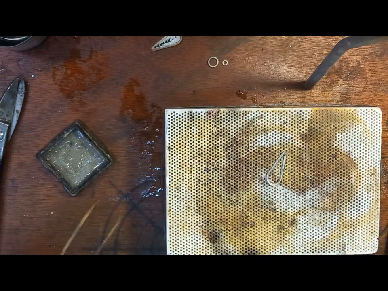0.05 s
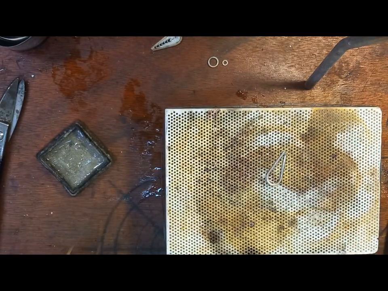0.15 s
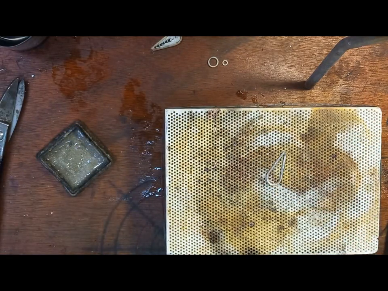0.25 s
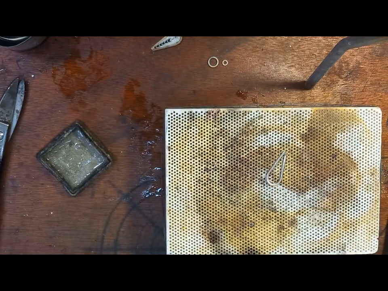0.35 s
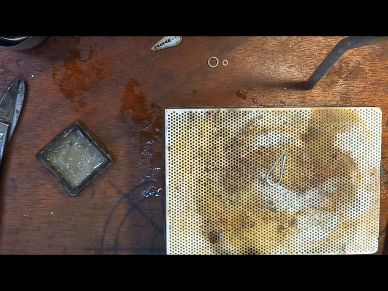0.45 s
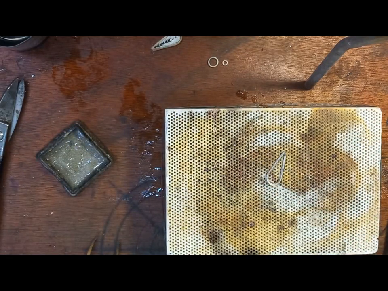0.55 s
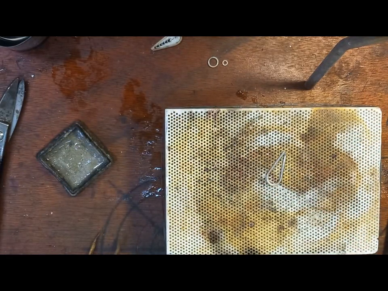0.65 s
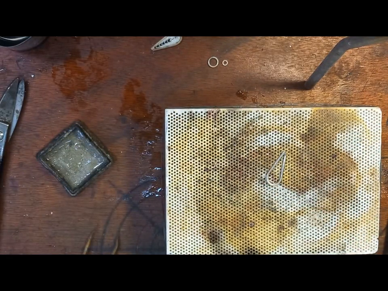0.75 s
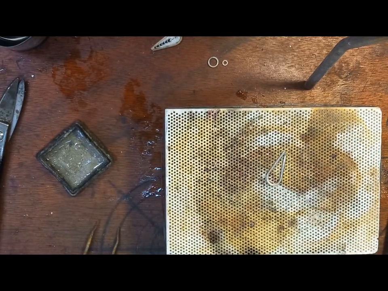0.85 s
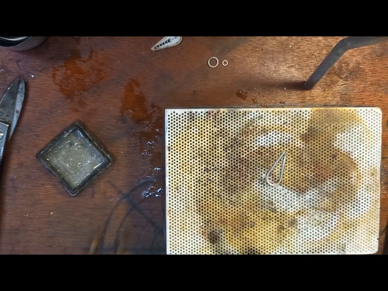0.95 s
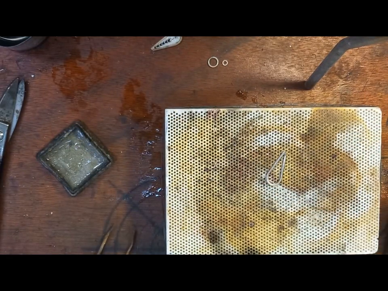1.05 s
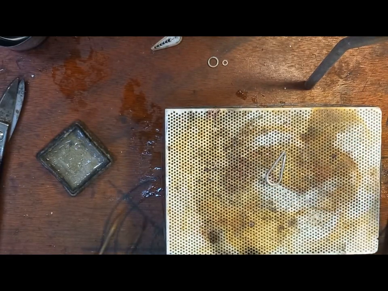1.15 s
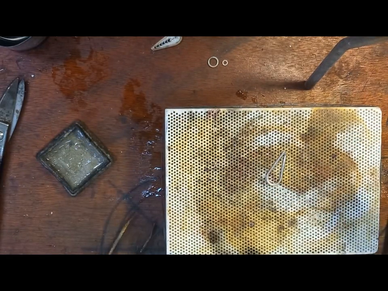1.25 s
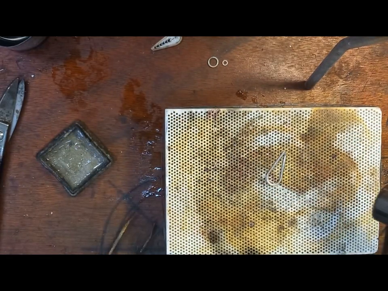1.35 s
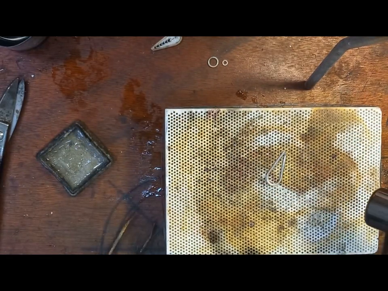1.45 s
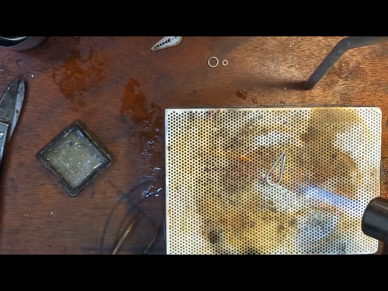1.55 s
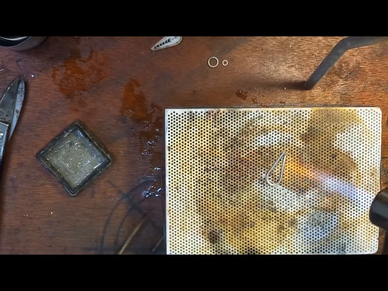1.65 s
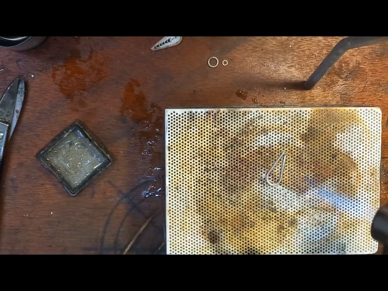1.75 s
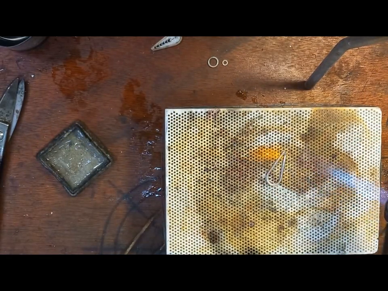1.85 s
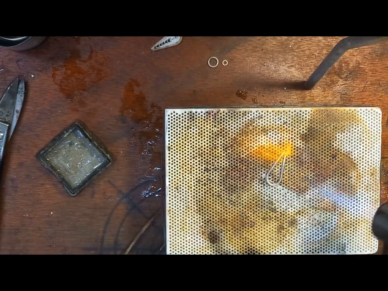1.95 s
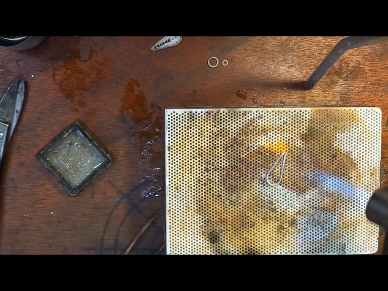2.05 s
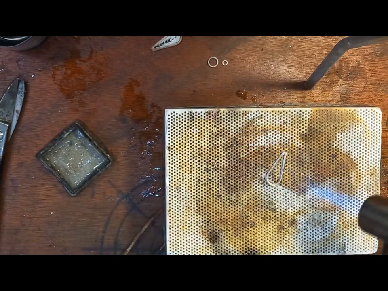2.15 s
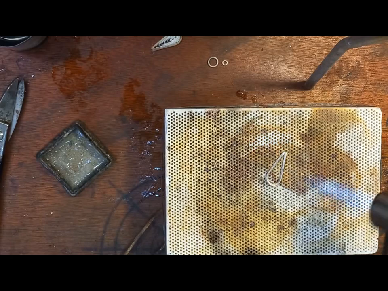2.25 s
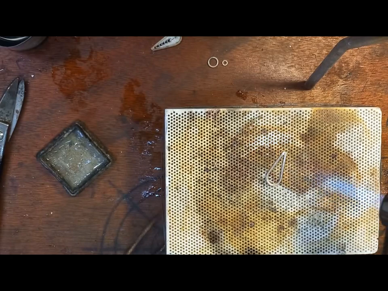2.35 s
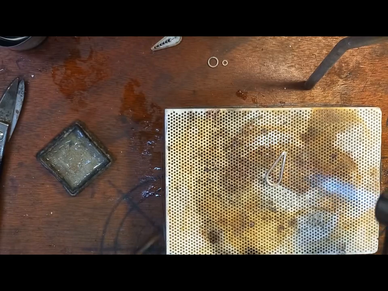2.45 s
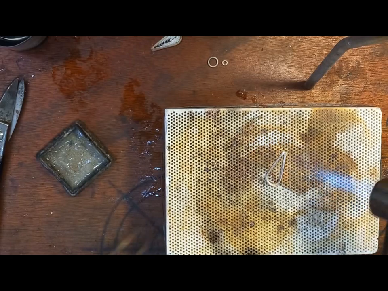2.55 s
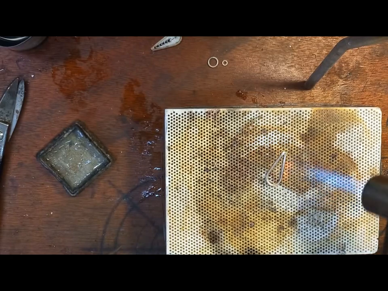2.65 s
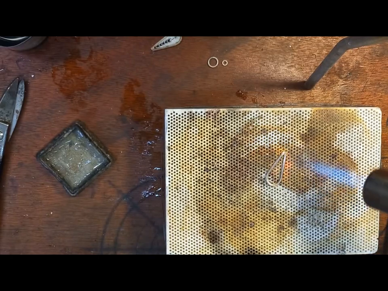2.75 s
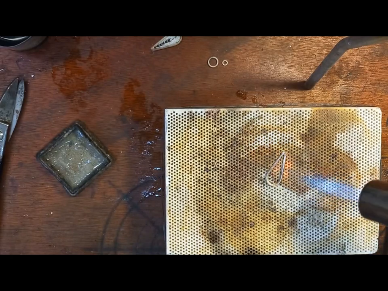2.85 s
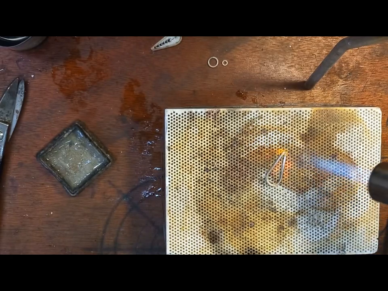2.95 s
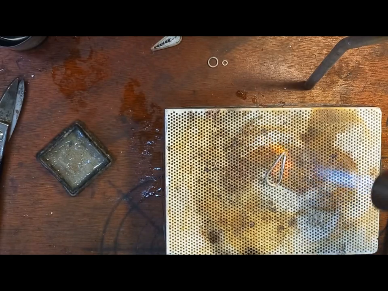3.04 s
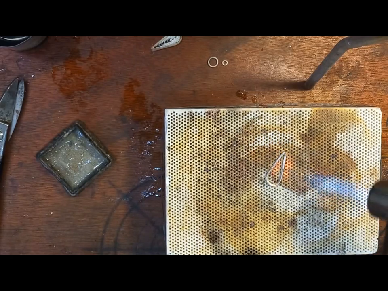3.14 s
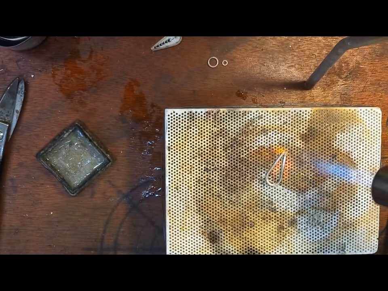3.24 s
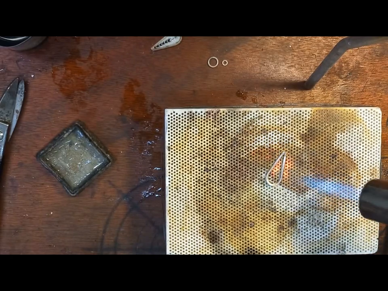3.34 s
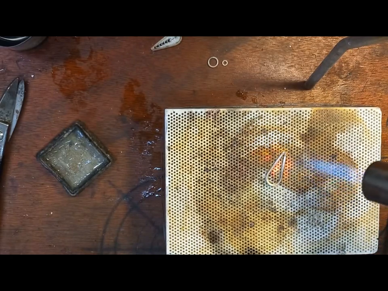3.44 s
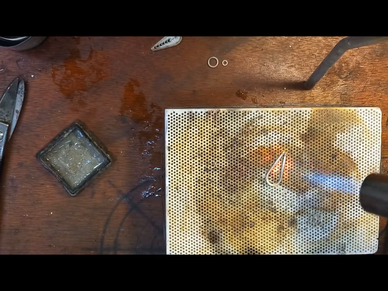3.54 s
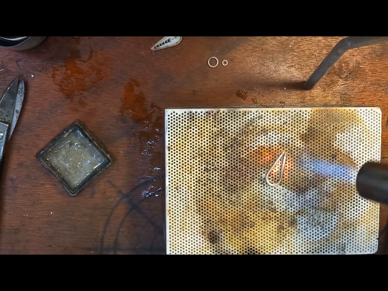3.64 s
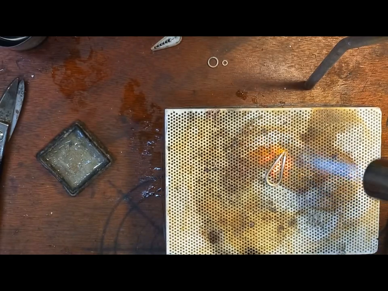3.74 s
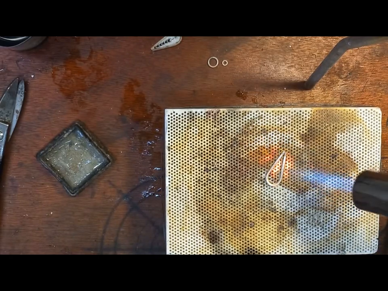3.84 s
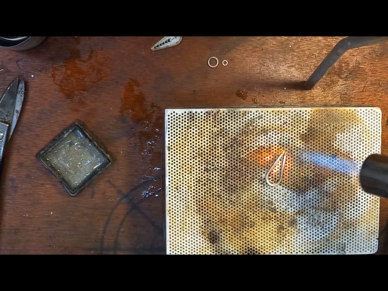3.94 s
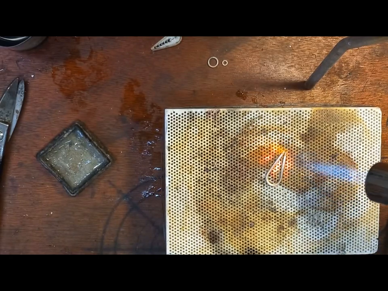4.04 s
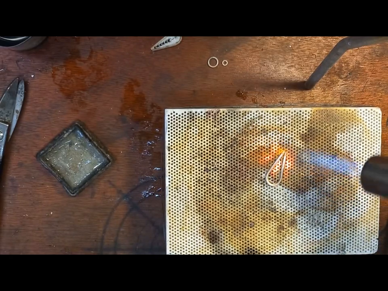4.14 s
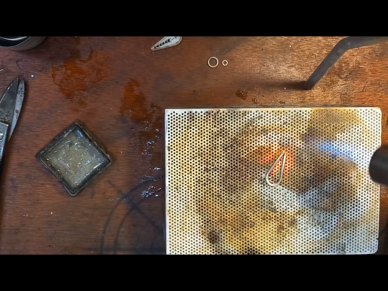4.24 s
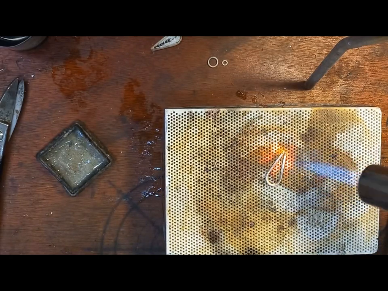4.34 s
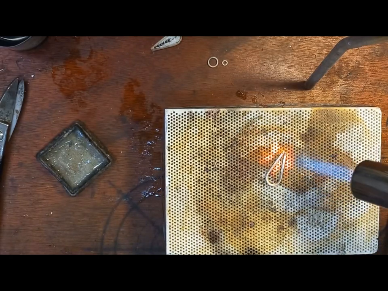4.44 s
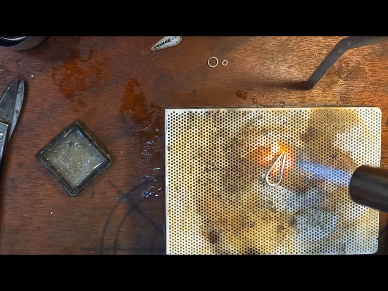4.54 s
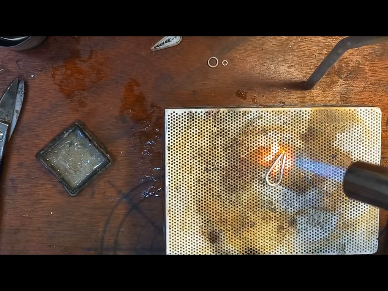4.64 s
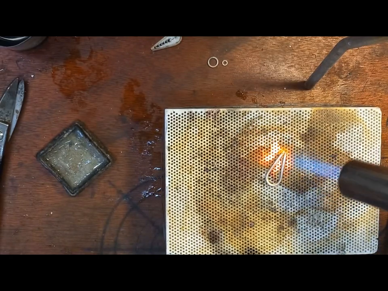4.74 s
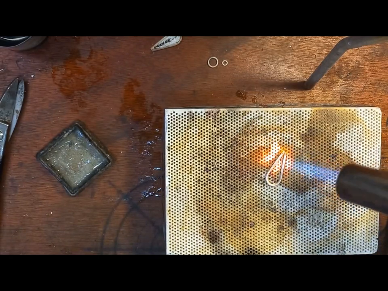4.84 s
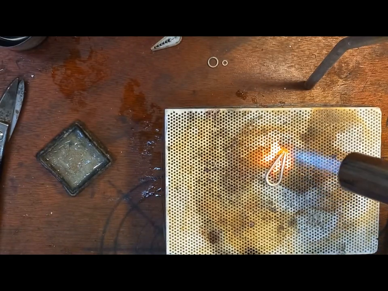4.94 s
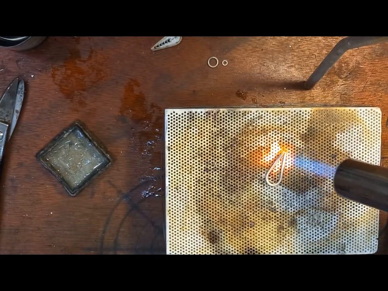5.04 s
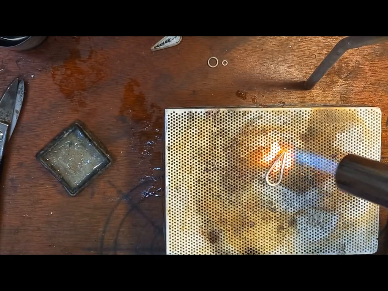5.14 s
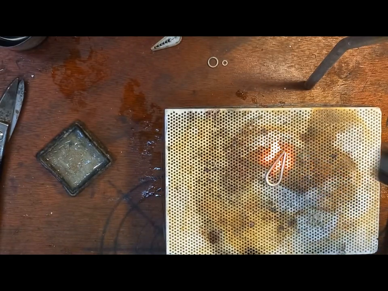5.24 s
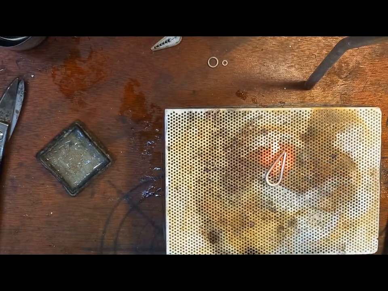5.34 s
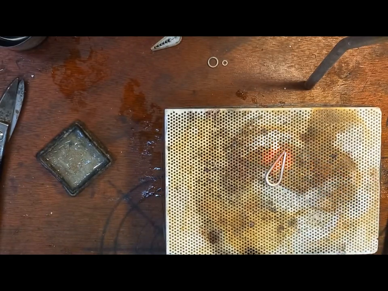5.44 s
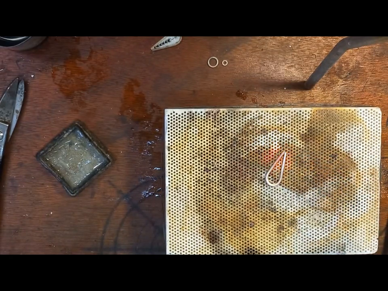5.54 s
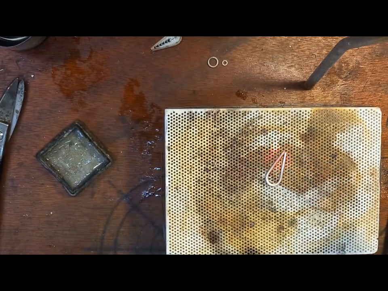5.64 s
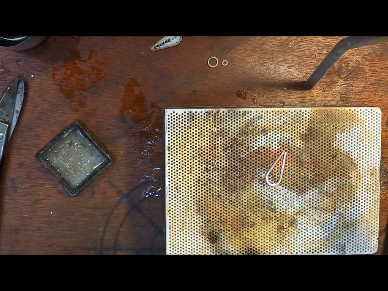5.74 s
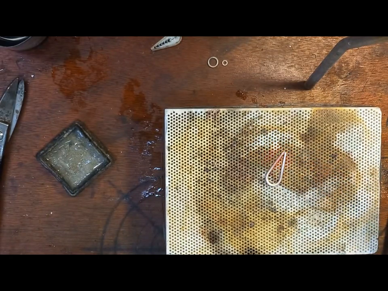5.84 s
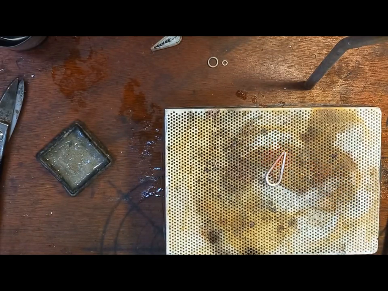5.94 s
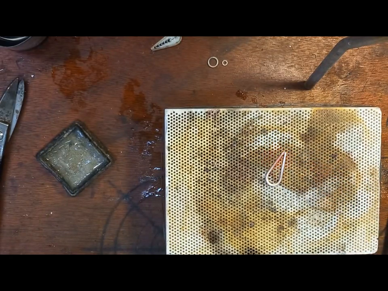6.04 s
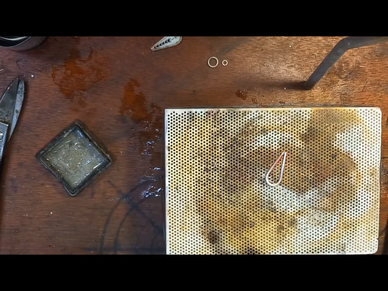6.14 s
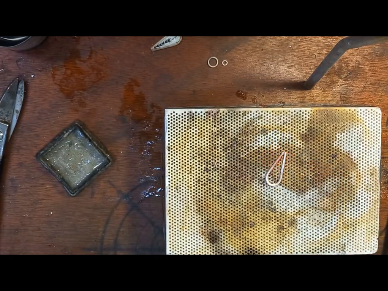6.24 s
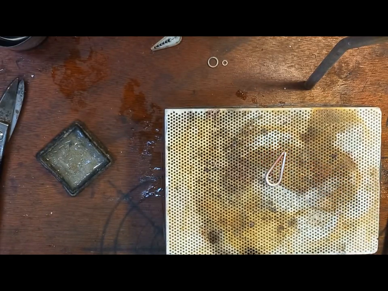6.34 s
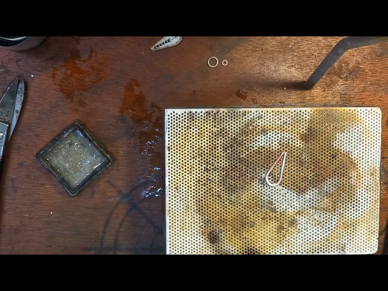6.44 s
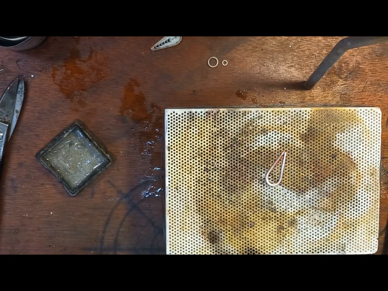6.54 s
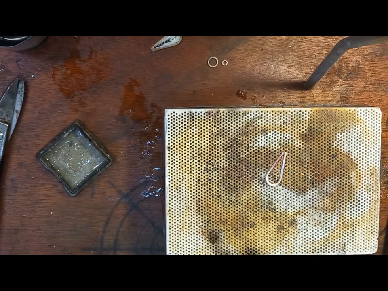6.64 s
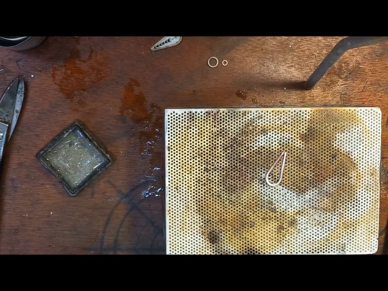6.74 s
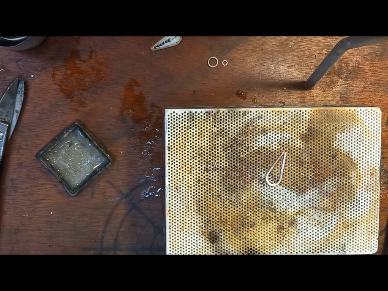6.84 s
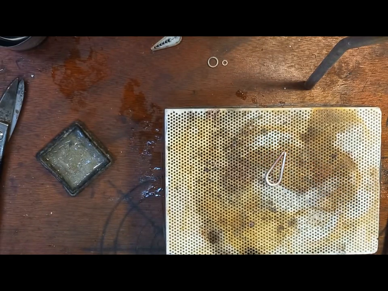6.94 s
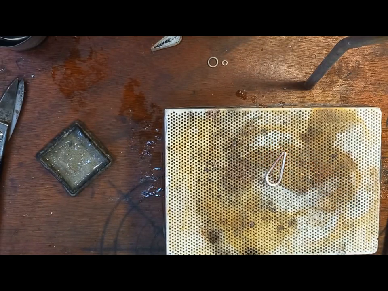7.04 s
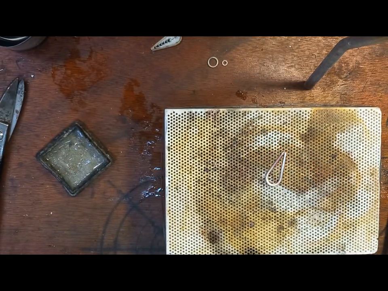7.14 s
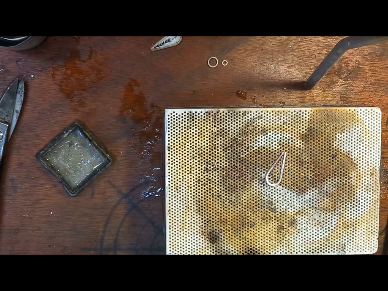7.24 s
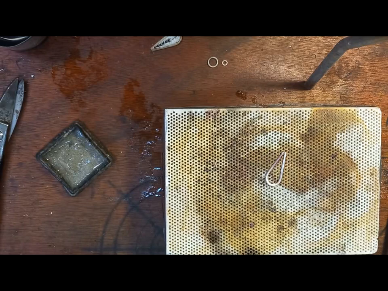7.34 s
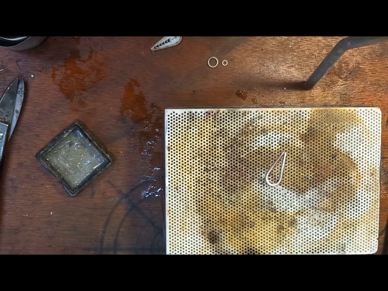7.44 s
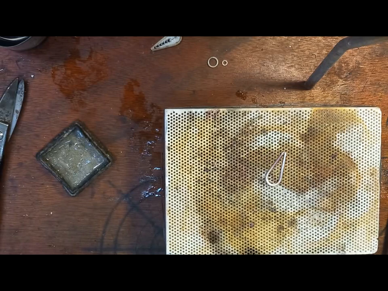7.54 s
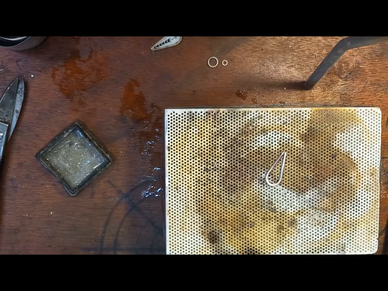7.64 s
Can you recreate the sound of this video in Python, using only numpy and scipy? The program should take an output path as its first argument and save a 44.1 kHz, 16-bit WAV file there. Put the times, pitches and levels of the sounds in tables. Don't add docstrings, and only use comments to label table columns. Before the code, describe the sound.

A close stereo microphone at a workbench in a small, short-sounding room; a ventilation motor rumbles and hums low throughout, with a faint wandering tone. From 0 to 0.9 s fingers, sleeves and small parts tick, slide and rub quietly, with a dull ringing contact near 0.6. At 0.95 s the torch body knocks hard on the bench, and a lighter knock follows at 1.25. Gas opens at 1.4 s with a thin, whistling hiss; at 1.53 a loud, bright spark cracks and the flame catches. It roars and hisses unevenly, its colour shifting as it moves over the brick and growing slightly stronger around 3 s. At 5.23 s the valve snaps and the flame dies almost instantly. A dull sleeve drag and two very faint, high squeaks come around 5.8 to 6.1, then sparse metal ticks and soft cloth rubs from 6.1 to 7.7.

```python
import sys
import numpy as np
from scipy import signal
from scipy.fft import rfft, irfft, next_fast_len
from scipy.io import wavfile
from scipy.ndimage import uniform_filter1d, map_coordinates

SR = 44100
rng = np.random.default_rng(int(sys.argv[2]) if len(sys.argv) > 2 else 0)


def pcm_store(signal):
    levels = np.round(np.clip(np.atleast_2d(signal), -1, 1) * 32767)
    wavfile.write(sys.argv[1], SR, levels.astype(np.int16).T)


def amplitude_ratio(level_db):
    exponent = np.asarray(level_db, float) / 20
    return 10 ** exponent


N = 339035
T = np.arange(N) / SR

# t/s, level/dB
FLAME = [(1.53, -27), (1.85, -25), (2.6, -26.5), (3.05, -24), (3.3, -24.5), (3.8, -24), (4.3, -25),
         (4.6, -24.5), (4.9, -24.5), (5.23, -24.5)]
# f/Hz, correlation
ALIKE_FLAME = [(150, .5), (210, .97), (650, .95), (780, .7), (950, .93), (1400, .7), (2100, .92),
               (2900, .5), (3350, .85), (4000, .7), (4600, .8), (6500, .55), (8300, .7), (13000, .5)]
# f/Hz, correlation
ALIKE_ROOM = [(60, 1), (110, 0.88), (170, 0.35), (250, 0.91), (450, 0.9), (700, 0.81), (1200, 0.27),
              (2400, .3), (4400, 0.082)]


def unit(x):
    return x / np.sqrt(np.mean(x ** 2) + 1e-20)


def along(points, hz):
    f, *columns = np.transpose(points)
    return np.array([np.interp(np.log(hz + 1), np.log(f + 1), column) for column in columns])


def colour(points, hz):
    low_edge = np.clip(hz / points[0][0], 0, 1) ** 8
    high_edge = np.clip(hz / points[-1][0], 1, 9) ** 8
    return amplitude_ratio(along(points, hz)) * low_edge / high_edge


def peak(hz, centre_hz, width_hz):
    return 1 / (1 + ((hz - centre_hz) / width_hz) ** 2)


def wobble(rate, size=N):
    knots = rng.standard_normal(int(size * rate / SR) + 4)
    return map_coordinates(knots, [np.arange(size) * rate / SR])


def filtered(x, response):
    m = next_fast_len(x.shape[-1] + 8192)
    spectrum = rfft(x, m) * response(np.fft.rfftfreq(m, 1 / SR))
    return irfft(spectrum, m)[..., :x.shape[-1]]


def patches(shape, bands, frames):
    field = uniform_filter1d(rng.standard_normal(shape), size=bands, axis=-2)
    return unit(uniform_filter1d(field, size=frames, axis=-1))


def rush(gain, alike, patchy_db, size=N, lead=((1, 0),)):
    z = signal.stft(rng.standard_normal((2, size + 512)), nperseg=512)[2]
    z = z * amplitude_ratio(patchy_db * patches(z.shape[1:], 6, 12))
    pair = signal.istft(z, nperseg=512)[1][:, :size]

    def split(hz):
        turn = np.arccos(np.clip(along(alike, hz)[0], -1, 1)) / 2
        return np.array([np.cos(turn), np.sin(turn)])

    def shift(hz):
        return np.exp(np.array([[-.5j], [.5j]]) * along(lead, hz))

    mid, side = filtered(pair, split)
    return unit(filtered(np.array([mid + side, mid - side]), lambda hz: gain(hz) * shift(hz)))


def moving(x, depth_db):
    z = signal.stft(x, nperseg=1024)[2]
    z = z * amplitude_ratio(depth_db * patches(z.shape, 4, 70) - .115 * depth_db ** 2)
    return signal.istft(z, nperseg=1024)[1][:, :N]


def add(out, s, x):
    part = out[:, round(s * SR):][:, :x.shape[1]]
    part += x[:, :part.shape[1]]


def echoes(x, wet_db):
    # f/Hz, time to fall 60 dB/s
    room = [(200, 0.31), (1000, 0.16), (4000, 0.17), (12000, 0.14)]
    hz, t, z = signal.stft(rng.standard_normal((2, SR // 4)), SR, nperseg=256)
    decay_db = -60 * t / along(room, hz)[0][:, None]
    tail = signal.istft(z * amplitude_ratio(decay_db), SR, nperseg=256)[1]
    wet = signal.fftconvolve(x, tail / np.linalg.norm(tail[0]), axes=1)[:, :x.shape[1]]
    late = round(0.0033 * SR)
    return x + amplitude_ratio(wet_db) * np.pad(wet, ((0, 0), (late, 0)))[:, :x.shape[1]]


def torch():
    comb = np.array([wobble(1400, size=SR // 2), wobble(1400, size=SR // 2)])

    def ripple(hz, depth_db):
        return amplitude_ratio(depth_db * comb[:, np.minimum(hz, SR // 2 - 1).astype(int)] * (hz > 1100))

    return flame(ripple) + unlit_gas(ripple)


def flame(ripple):
    # f/Hz, left level/dB, right level/dB
    roar_colour = [(154, -18.5, -19.5), (204.8, -3.5, 0), (258, -10.5, -8), (414, -4, -2.5), (608, -5, -6),
                   (800, -32, -12.5), (921, -9.5, -9.5), (1163, -16.5, -12), (1330, -15, -41),
                   (1468, -29.5, -13), (1637, -11, -22.5), (1770, -12.5, -16), (2366, -15.5, -17.5),
                   (2694, -27, -33.5)]
    # f/Hz, left level/dB, right level/dB
    jet_colour = [(2300, 11, -2), (2540, -14.5, -11.5), (3340, -6.5, -7), (4250, -11, -5.5),
                  (4850, -9, -14.5), (5600, -18.5, -9), (6830, -15, -9.5), (7940, -10.5, -0.5),
                  (8210, -0.5, -26), (8980, -19, -27.5), (9700, -22.5, -22.5), (11540, -18, -20.5),
                  (12560, -13, -12.5), (15750, -25, -21.5)]
    # f/Hz, width/Hz, left level/dB, right level/dB
    standing = [(210, 18, 3.5, 2.5), (288, 6.7, 4.5, -7), (331.6, 4.2, 12.5, 5.5), (363.5, 5.8, -1.5, -1),
                (391, 10.3, -1.5, 4.5), (443, 8.4, -0.5, 6), (456.5, 5.8, -16, -20), (530, 6.5, -3.5, -20),
                (572.2, 3.4, 6.5, 10), (623, 16.6, -2.5, -4), (636.5, 24, 7, 7.5), (703, 11, 18, -6),
                (710, 13, -14, 5), (843.3, 5, 18, 7.5), (868, 18, 6.5, -6), (918, 6.5, -10, -13),
                (905.6, 7.2, 5, 7), (1065, 6.8, 0.5, 1), (1298, 8.9, 8.5, -3), (1402, 14.6, 6.5, 14.5),
                (1557, 13, 0, 11), (1694, 27, -3.5, -5), (1910, 42, 3, 3), (2040, 8.8, -9, 0),
                (2510, 15, -7, -19), (2552, 23, 4.5, 8.5), (5300, 69, 7, 8.5), (6320, 150, -9, 5.5),
                (6600, 180, 8, -4), (7630, 170, 5.5, -5)]
    # f/Hz, lead of the right side/radians
    lead_flame = [(2550, 0), (2850, 1.4), (3400, .4), (3650, 1.6), (3900, .3), (4080, 3), (4700, 0),
                  (5150, 3), (5400, 2), (6250, 3), (7000, 6.3), (7700, 8.9), (8400, 9.5), (8900, 11),
                  (10500, 10.5)]

    strength_db = np.interp(T, *np.transpose(FLAME))
    swing_db = strength_db - np.mean(FLAME, axis=0)[1]
    burn_db = np.array([strength_db, -39.5 + 0.54 * swing_db, -48 + 0.77 * swing_db])
    lit_s, starve_s = 1.528, 5.225
    catch = np.clip((T - lit_s) / .007, 0, 1)
    fill_out = 1 - .4 * np.exp(-np.clip(T - lit_s, 0, 9) / .025)
    fade_db = np.clip(T - starve_s, 0, 1) * np.array([[-470], [-380], [-330]])
    roar_gain, hiss_gain, top_gain = amplitude_ratio(burn_db + fade_db) * catch * fill_out

    def modes(hz):
        return amplitude_ratio(sum(np.outer([left, right], np.exp(-.5 * ((hz - centre) / width) ** 2))
                       for centre, width, left, right in standing))

    def roar_shape(hz):
        return colour(roar_colour, hz) * modes(hz) * ripple(hz, 0.85)

    def jet_shape(hz):
        return colour(jet_colour, hz) * modes(hz) * ripple(hz, 1.5)

    flicker = 0.07 * wobble(17) + 0.12 * wobble(60)
    roar = amplitude_ratio(flicker) * rush(roar_shape, ALIKE_FLAME, patchy_db=0.73, lead=lead_flame)
    hiss = rush(lambda hz: jet_shape(hz) * (hz > 2600) * (hz < 8800), ALIKE_FLAME, 1.1, lead=lead_flame)
    top = rush(lambda hz: jet_shape(hz) * (hz >= 8800), ALIKE_FLAME, 1.1, lead=lead_flame)
    jet = moving(hiss_gain * hiss + amplitude_ratio(0.8) * top_gain * top, depth_db=2.2)
    return amplitude_ratio(0.5) * roar_gain * roar + amplitude_ratio(2.4 * flicker + 3.0) * jet


def unlit_gas(ripple):
    # f/Hz, left level/dB, right level/dB
    nozzle = [(2800, -23, -21), (3630, -0.5, -7.5), (4270, -16, -24), (4800, -12, -7), (5400, -17, -9),
              (6330, -14, -2), (7660, -2, -0.5), (7950, -14, -4), (8330, 1, -20), (9300, -9.5, -16),
              (10500, -27, -23), (13000, -12, -15), (15500, -25, -24)]
    # f/Hz, width/Hz, level/dB
    whistles = [(3500, 120, -0.5), (4400, 230, -6), (5300, 200, -3), (6270, 60, 6), (7250, 60, 7),
                (8170, 70, 2), (8400, 60, 5), (13000, 150, 2)]
    valve_s, open_s, lit_s = 1.396, 0.026, 1.52
    opened = np.clip((T - valve_s) / open_s, 0, None)
    surge_db = 2.5 * np.exp(1 - np.maximum(opened, 1))
    fade_db = 110 * np.clip(T - lit_s, 0, 2)
    flow = np.minimum(opened, 1) ** 1.5 * amplitude_ratio(-39 + surge_db - fade_db)

    def sings(hz):
        return amplitude_ratio(sum(db * np.exp(-.5 * ((hz - centre) / width) ** 2) for centre, width, db in whistles))

    hiss = rush(lambda hz: colour(nozzle, hz) * sings(hz) * ripple(hz, 1), [(5000, 0.19)], patchy_db=1.5)
    return amplitude_ratio(2.5) * flow * hiss


def snaps():
    # t/s, level/dB, time to fall 60 dB/s, low ring f/Hz, high ring f/Hz
    events = [
        (1.5266, -13.5, .01, 3900, 7100),
        (5.2272, -21, .018, 5450, 7860),
    ]
    # f/Hz, left level/dB, right level/dB
    spark = [(800, -35, -32), (1520, 9, -6), (2500, -28, -25), (3800, -3.5, -6), (5000, -14, -8),
             (7100, -10, 3), (8650, -12, -13), (9700, -19, -18), (13000, -8, -8), (15500, -11, -11)]
    # f/Hz, left level/dB, right level/dB
    valve = [(2500, -14, -14), (4300, -4, -4), (5450, -5, -3), (6590, -9, -7), (7800, 0, -3),
             (9800, -24, -22), (12500, -15, -14), (15500, -18, -18)]
    rises = [.0001, .002]
    out, t = np.zeros((2, N)), T[:SR // 4]
    for (s, db, t60, low_hz, high_hz), spectrum, rise in zip(events, [spark, valve], rises):
        shape = amplitude_ratio(db - 60 * t / t60) * np.clip(t / rise, 0, 1)
        crack = rush(lambda hz: colour(spectrum, hz), [(5000, .5)], patchy_db=0, size=len(t))
        ring = .45 * np.sin(2 * np.pi * low_hz * t) + .5 * np.sin(2 * np.pi * high_hz * t)
        add(out, s, echoes(shape * crack, wet_db=-1.5) + shape * ring * amplitude_ratio([[-3], [2]]))
    return out


def knocks():
    # main blow t/s, level/dB, brightness/dB per octave, rise/s, puff level/dB
    blows = [
        (0.9485, -9, 2, 0.0046, -1.5),
        (1.2456, -19.5, 0.5, 0.0015, -2),
    ]
    # f/Hz, level/dB, time to fall 60 dB/s
    body_modes = [
        [(300, -11, 0.1), (419, -9, 0.03), (620, -14, 0.07), (755, -15, 0.07), (1128, 1, 0.018),
         (1740, -12, 0.045), (2150, -2, 0.016), (2840, -19, .04), (3570, -19, .03), (4600, -22, .012)],
        [(212, -12, .12), (303, -7, 0.1), (445, -6, 0.06), (550, 0, 0.035), (700, -7, 0.03), (1000, -3, .022),
         (1300, -14, .025), (1840, -18, 0.02), (2200, -19, .015), (2550, -24, .025), (3450, -21, .01)],
    ]
    # time before the main blow/s, level under it/dB, direction
    contacts = [
        [(.004, -15, -1), (.0019, -7, -1), (0, 0, -1)],
        [(.001, -10, -1), (0, 0, 1)],
    ]
    # f/Hz, left level/dB, right level/dB
    puff_colour = [(200, -16, -22), (305, 3, 5), (597, -5, -3.5), (790, -3.5, -1.5), (1160, -10, -7),
                   (1410, -12, -15), (2090, -12.5, -15.5), (2800, -24.5, -23), (3970, -34, -30.5),
                   (7100, -44, -44), (9000, -57, -63), (12000, -73, -66)]
    contact_s, right_late_s = .00022, .00015
    out, t = np.zeros((2, N)), T[:SR // 3]
    late = np.clip(t - np.array([[0], [right_late_s]]), 0, 1)
    low_cut = signal.butter(2, 190, 'high', fs=SR, output='sos')
    for (s, db, tilt_db, rise, puff_db), modes, touches in zip(blows, body_modes, contacts):
        body, first = np.zeros((2, len(t))), touches[0][0]
        for early, under_db, way in touches:
            ring = 0
            for hz, level, t60 in modes:
                rough = 0.2 * wobble(200, size=len(t)) * np.minimum(late / .004, 1)
                ring = ring + amplitude_ratio(level - 60 * late / t60) * np.sin(2 * np.pi * hz * late + rough)
            onset = (1 - np.exp(-late / contact_s)) ** 2
            add(body, first - early, way * amplitude_ratio(under_db) * ring * onset)
        body = signal.sosfilt(low_cut, body)
        add(out, s - first, amplitude_ratio(db + 3) * echoes(body * amplitude_ratio([[2.5], [-2.5]]), wet_db=-9))

        def puff_shape(hz):
            return colour(puff_colour, hz) * amplitude_ratio(tilt_db * np.log2(hz / 300 + .1))

        puff = rush(puff_shape, ALIKE_FLAME, patchy_db=2.9, size=len(t))
        swell = np.clip(t / rise, 0, 1) ** 2.0 * amplitude_ratio(-60 * t / 0.072)
        add(out, s - rise, amplitude_ratio(db + puff_db) * echoes(swell * puff, wet_db=-1.5))
    return out


def first_contact(t):
    return np.clip(t / .0005, 0, 1) * (1 + 1.1 * amplitude_ratio(-60 * t / .012))


def ticks():
    # t/s, crack level/dB, thud level/dB, weight (middle) level/dB
    events = [(0.0572, -53, 14, 8), (0.473, -46.5, 11, 4), (0.564, -42.5, -9, 0.5), (0.5851, -43, 10, 4),
              (0.8287, -47, 14, 0), (0.8894, -51, 2, -13), (6.114, -51, -9, -15), (6.1672, -48.5, -1, -12),
              (6.4326, -45.5, -2, -3), (5.252, -38, -2, 10), (6.84, -45, 1, 4), (6.866, -48, -5, 2),
              (7.218, -53, 13, -6), (7.288, -53, 4, -14), (7.349, -58, 14, 8), (7.441, -43.5, 0, -1),
              (7.5316, -46, -2, 3), (7.67, -50.5, 16.5, -2)]
    band_t60 = [0.052, 0.24, 0.13, .07]
    # f/Hz, left level/dB, right level/dB
    sparkle = [(4600, -13, -10), (5300, -3, -1), (7000, 2, 1), (9000, -4, -6), (11000, -1, 2),
               (12500, -3, -7), (14200, 1, 1), (15500, -7, -6)]
    bands = [lambda hz: peak(hz, 4600, 2900) * (hz < 8700),
             lambda hz: peak(hz, 440, 80),
             lambda hz: peak(hz, 1050, 810),
             lambda hz: colour(sparkle, hz)]
    out, t = np.zeros((2, N)), T[:SR // 5]
    for s, db, thud_db, weight_db in events:
        sparkle_db = -20 - 1.24 * weight_db
        for band, t60, rel_db in zip(bands, band_t60, [0, thud_db, weight_db, sparkle_db]):
            noise = rush(band, ALIKE_FLAME, patchy_db=1.5, size=len(t))
            add(out, s, first_contact(t) * amplitude_ratio(db + rel_db - 7.5 - 60 * t / t60) * noise)
    return out


def bumps():
    # t/s, level/dB, main resonance f/Hz, slide length/s
    events = [
        (0.404, -39, 670, 0.055),
        (0.764, -39, 734, 0.085),
    ]
    # f/Hz, width/Hz, level/dB
    hollow = [(340, 48, -2.5), (1730, 140, -16.5), (2550, 120, -33), (3620, 160, -26), (6900, 270, -36)]
    out, t = np.zeros((2, N)), T[:SR // 5]
    for s, db, low_hz, length in events:
        def cavity(hz):
            others = sum(amplitude_ratio(level) * peak(hz, centre, width) for centre, width, level in hollow)
            return peak(hz, low_hz, 86) + others

        stop_db = 690 * np.clip(t - length, 0, 1)
        shape = first_contact(t) * amplitude_ratio(db - stop_db - 60 * t) * (1 + amplitude_ratio(-60 * t / 0.1))
        add(out, s, shape * rush(cavity, ALIKE_FLAME, patchy_db=2.0, size=len(t)))
    return out


def pings():
    # t/s, level/dB, f/Hz, time to fall 60 dB/s
    parts = [(.5635, -45, 1170, .05), (.585, -25.5, 273, 0.059), (.5855, -42, 1155, .04),
             (0.7644, -42.5, 1770, .12), (6.113, -53, 5300, 0.048), (6.433, -43.5, 2060, 0.034),
             (6.8346, -35.5, 1964, 0.11), (7.441, -55, 2500, .05)]
    out, t = np.zeros((2, N)), T[:SR // 5]
    for s, db, hz, t60 in parts:
        def close_modes(f):
            return peak(f, hz, 0.13 * hz) + 0.15 * peak(f, 1.24 * hz, 0.063 * hz)

        ring = 0.77 * rush(close_modes, ALIKE_FLAME, patchy_db=-1.0, size=len(t))
        ring = ring + 0.89 * np.sin(2 * np.pi * hz * t)
        add(out, s, echoes(ring * amplitude_ratio(db - 60 * t / t60), wet_db=-3.0))
    return out


def cloth():
    # loudest t/s, level/dB, rise/s, fall/s
    strokes = [(.004, -58.5, 0.011, 0.018), (.446, -68.5, 0.074, 0.22), (.596, -73, 0.083, .12),
               (.776, -68, 0.054, 0.31), (.89, -80, 0.024, 0.18), (6.21, -74, 0.35, 0.075),
               (6.44, -67.5, .03, .12), (6.694, -77, .1, .13), (6.9, -68.5, 0.14, 0.25),
               (7.154, -79, .05, .08), (7.218, -75, .012, .1), (7.295, -70.5, .01, 0.097),
               (7.534, -68, .14, .1), (7.688, -70, .05, .1)]
    # f/Hz, left level/dB, right level/dB
    cloth_colour = [(300, 20, 24), (1000, 16, 21.5), (3000, 10, 10.5), (7750, 5.5, 10), (9200, -2, -8),
                    (12000, -7, 1), (14200, 4, -4), (15600, -4, -1)]
    # centre t/s, half length/s, level/dB, f/Hz, width/Hz
    drag = (5.9, -0.3, -56, 1300, 600)
    s, half, db, centre_hz, width_hz = drag
    drag_noise = rush(lambda hz: peak(hz, centre_hz, width_hz), ALIKE_ROOM, patchy_db=2.2)
    dragging = amplitude_ratio(db) * np.exp(-((T - s) / half) ** 2) * drag_noise
    rub = 0
    for s, db, rise, fall in strokes:
        away = np.clip(np.maximum((s - T) / rise, (T - s) / fall), 0, 9)
        rub = rub + amplitude_ratio(db - 26.5 * away)
    rub = amplitude_ratio(18 + 2.7 * wobble(65)) * rub
    return dragging + rub * rush(lambda hz: colour(cloth_colour, hz), ALIKE_ROOM, patchy_db=2.0)


def squeaks():
    # t/s, length/s, level/dB
    events = [
        (5.815, 0.18, -84),
        (6.02, .08, -85),
    ]
    top_hz, sag_hz, crest = 12400, 2400, .62
    out = np.zeros((2, N))
    for s, length, db in events:
        u = np.arange(round(length * SR)) / (length * SR)
        hz = top_hz - sag_hz * (u - crest) ** 2 + 130 * wobble(160, size=len(u))
        level = np.sin(np.pi * u) ** 1.2 * amplitude_ratio(db + 8 + 2.5 * wobble(70, size=len(u)))
        tone = level * np.sin(2 * np.pi * np.cumsum(hz) / SR)
        add(out, s, tone * amplitude_ratio([[0.2], [-0.2]]))
    return out


def ventilation():
    # t/s, level/dB
    fan = [(0, -30.5), (.7, -31.5), (1.2, -33), (2.4, -35), (3.3, -31.5), (4.9, -31), (5.6, -34.5),
           (6.3, -32), (6.7, -30.5), (7.69, -32)]
    # f/Hz, left level/dB, right level/dB
    rumble_colour = [(40, -30, -26), (64, -22, -28), (75.8, -12, -13), (81.3, 4.5, 5.5),
                     (101.4, -8.5, -5.5), (110, -5, -1.5), (139, -11.5, -13), (166, -20.5, -28)]
    # f/Hz, left level/dB, right level/dB
    air_colour = [(125, -17, -28), (199, -26, -12.5), (257, -19, -27), (387, -31.5, -28), (527, -26, -29),
                  (770, -31.5, -33.5), (1500, -36, -38), (2420, -43, -47.5), (4900, -56, -51),
                  (7470, -55, -53), (9300, -71, -77), (15500, -71, -68)]
    # f/Hz, lead of the right side/radians
    lead_room = [(400, -1), (700, 1.37), (1400, 2.5), (2500, 5)]
    # multiple of the shaft rate, level/dB
    orders = [(2, -38), (3, -45.5), (4, -55), (5, -52), (6, -45.5), (8, -56.5), (9, -77), (10, -62),
              (14, -59.5)]
    # centre t/s, half length/s, rise/dB
    blade_swells = [(.2, 0.25, 5.5), (5.75, .15, 7), (6.22, 0.25, 6.5), (6.59, .05, 6), (7.41, 0.24, 4),
                    (7.68, .04, 8)]
    shaft_hz, blade_hz = 37.6, 442.6

    rumble = rush(lambda hz: colour(rumble_colour, hz), ALIKE_ROOM, patchy_db=0.0)
    rumble = amplitude_ratio(np.interp(T, *np.transpose(fan)) - 1.0) * rumble
    shut = FLAME[-1][0]
    air_db = -42 - 2 * (T > shut) * np.exp(-((T - shut) / 2) ** 2)
    air = rush(lambda hz: colour(air_colour, hz), ALIKE_ROOM, patchy_db=1.0, lead=lead_room)
    turns = shaft_hz * T + 0.0017 * wobble(4.9)
    hum = sum(amplitude_ratio(db + 1.5 + 1.8 * wobble(4)) * np.sin(2 * np.pi * k * turns) for k, db in orders)
    blade_db = -57.5 + sum(db * np.exp(-((T - s) / half) ** 4) for s, half, db in blade_swells)
    flutter_db = 4 * wobble(14) - 3
    blade = np.sin(2 * np.pi * (blade_hz * T + 0.4 * wobble(10.5)))
    blade = amplitude_ratio(blade_db + 4.5 + flutter_db) * blade
    return rumble + amplitude_ratio(air_db) * air + (hum + blade) * amplitude_ratio([[-.8], [.8]])


def scene():
    handling = ticks() + bumps() + pings() + cloth()
    return torch() + snaps() + knocks() + handling + squeaks() + ventilation()


def low_pass(x):
    return signal.sosfilt(signal.butter(12, 15830, fs=SR, output="sos"), x)


def record(dry):
    mix = filtered(dry, lambda hz: hz < 15800)
    return low_pass(mix)


dry = scene()
out = record(dry)
pcm_store(out)
```